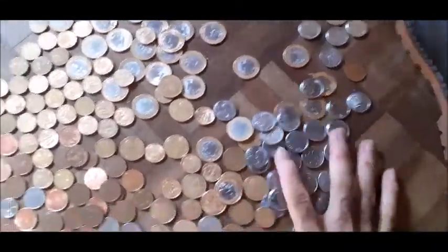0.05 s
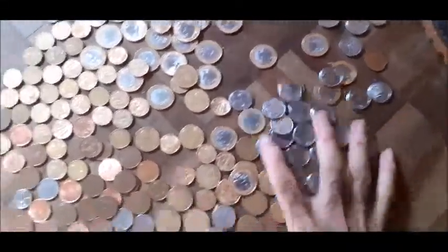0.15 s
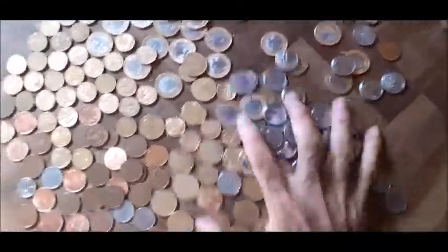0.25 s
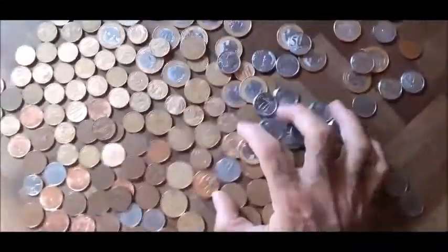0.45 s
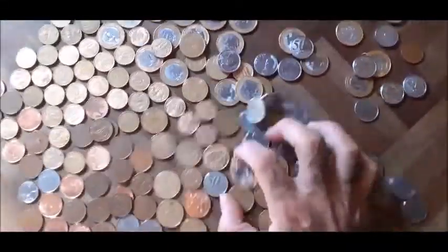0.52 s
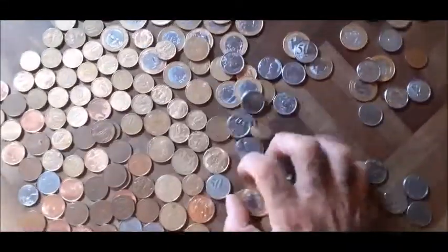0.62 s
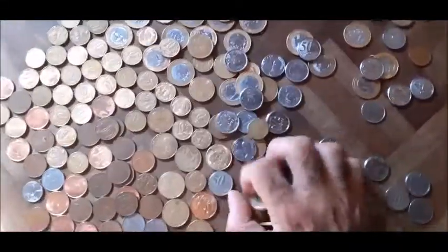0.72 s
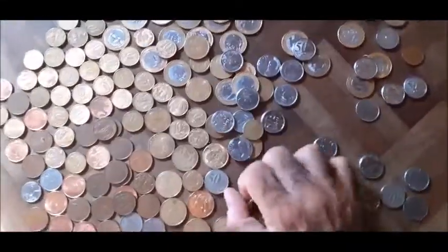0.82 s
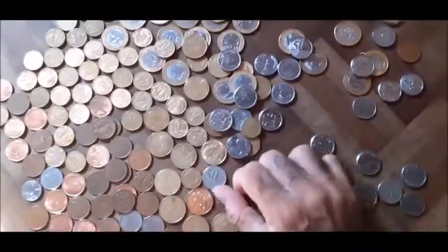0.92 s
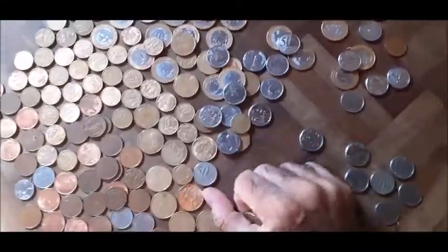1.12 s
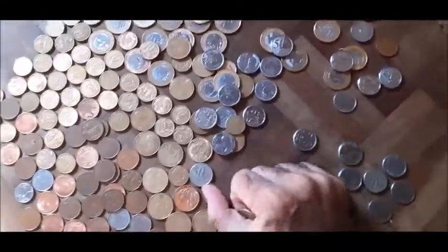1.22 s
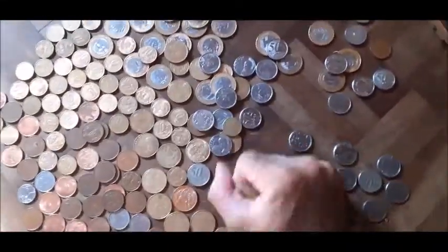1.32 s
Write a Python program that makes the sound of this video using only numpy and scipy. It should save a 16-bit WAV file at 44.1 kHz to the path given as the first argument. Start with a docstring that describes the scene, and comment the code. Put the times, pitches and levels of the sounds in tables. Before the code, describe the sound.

Coins jingle, click and slide over a wooden surface, pushed by a hand.

```python
"""A hand pushes loose coins over a wooden top, close to a phone in a small room.
From the start the coins jostle in a dense run of tiny impacts, with sharper clicks among them.
By 0.3 s their faces scrape the wood, which rumbles and knocks when a coin tips off a pile.
The clatter builds, and just after 0.8 s small coins, free to vibrate, give a brief high ring.
More scraping follows, then a last clink near 1.2 s, and the sound dies away into faint hiss."""
import sys
import numpy as np
from scipy import signal
from scipy.fft import rfft, irfft
from scipy.io import wavfile
from scipy.ndimage import uniform_filter1d

SR = 44100
rng = np.random.default_rng(int(sys.argv[2]) if len(sys.argv) > 2 else 0)


def to_wav(s):
    """Save 16-bit WAV."""
    ch = np.atleast_2d(s).T  # columns
    pcm = np.round(np.clip(ch, -1, 1) * 32767)  # PCM
    wavfile.write(sys.argv[1], SR, pcm.astype(np.int16))


N = 59535

# Levels are relative within each table.
# rim-to-rim impacts: start_s, level_db, centre_hz
RIM_CLICKS = [(.0030, -27.5, 10300), (0.0206, -23, 11200), (0.037, -33, 9900), (0.0399, -23, 9300),
              (0.0658, -18, 9200), (0.0892, -26, 8500), (0.1114, -17, 9700), (.1443, -20.5, 8250),
              (0.156, -25, 8500), (0.205, -19.5, 6950), (0.247, -38, 5950), (0.267, -16, 6240),
              (.2714, -22, 10700), (0.3194, -18, 11100), (0.3229, -14.5, 11900), (0.4272, -16.5, 9300),
              (0.4615, -23, 7100), (0.5284, -20, 4340), (0.55, -25, 9300), (0.551, -9.5, 7240),
              (0.555, -30, 8500), (0.5985, -13, 7400), (0.632, -28, 11000), (0.6365, -11, 6960),
              (0.649, -8.5, 13200), (0.6834, -11, 10700), (0.686, -10.5, 10300), (0.7073, -25, 11500),
              (0.7179, -14, 12000), (0.7666, -18, 10100), (0.7745, -22, 5200), (0.7985, -19, 8000),
              (0.816, -18, 10000), (0.8202, -16, 6750), (0.841, -14, 9600), (.9688, -18, 10000),
              (0.986, -20, 9200), (1.0097, -41, 6840), (1.025, -18, 9600), (1.0461, -20, 8000),
              (1.114, -46, 8900), (1.1486, -46, 9500), (1.1694, -38, 8500), (1.1812, -21, 9060),
              (1.2450, -40.5, 6300), (1.3191, -45, 9050)]
# coins struck while free to vibrate: start_s, level_db, pitch_hz, t60_s
FREE_RINGS = [(.003, -25, 11010, 0.052), (.041, -36, 11100, 0.028), (0.169, -44, 11350, .12),
              (0.191, -36, 11300, .15), (0.223, -18, 11325, 0.04), (0.269, -12.5, 11610, 0.05),
              (.377, -25, 15600, .08), (.427, -29, 15660, 0.091), (0.63, -19, 11400, 0.076),
              (.636, -16, 15650, 0.069), (0.674, -18, 11000, 0.03), (0.8085, -4, 15545, .07),
              (.8125, -20, 15670, 0.037), (.820, -29, 15615, 0.061), (0.843, -18, 11068, .15),
              (0.843, -5, 16100, 0.093), (.865, -35, 15500, 0.13), (.874, -23, 15600, .06),
              (1.1808, -17, 15700, .018)]
# coin edges catching on the wood: start_s, level_db, pitch_hz
EDGE_CLACKS = [(.319, -37, 1600), (.472, -41.5, 1500), (.5288, -31.5, 3600), (.592, -31.5, 1500),
               (.598, -32, 1600), (.686, -33.5, 1200), (0.7736, -33, 1810), (.792, -28.5, 1400),
               (.840, -36, 1400), (.935, -39, 1500), (.966, -41, 1600), (1.0105, -30, 1400),
               (1.0435, -29.5, 1400), (1.147, -46, 1400), (1.192, -48.5, 1400), (1.245, -54, 1500),
               (1.278, -65, 1600)]
# coins dropping flat: start_s, level_db, left_minus_right_db
FLAT_DROPS = [(.065, -52.5, -4), (.326, -38.5, -14), (0.348, -48, -16), (0.6, -37, 3), (.638, -33.5, -18.5),
              (.647, -33, -13.5), (.686, -30.5, 4), (0.72, -33.5, -9.5), (.871, -45.5, -20.5)]
# normal modes of the wooden top: pitch_hz, level_db, t60_s
WOOD_MODES = [(103, -15, 0.15), (221, -12, 0.036), (289, -7.5, 0.042), (352, -3.5, 0.043),
              (526, -13.5, 0.015), (565, -13, 0.075), (775, -12, 0.036), (980, -7, 0.021)]

# envelopes of the continuous textures: time_s, level_db
RUMBLE_LEVEL = [(0, -72), (.07, -62), (.21, -65), (.27, -55), (.35, -55.5), (.40, -60), (.53, -64.5),
                (.56, -50.5), (.65, -50.5), (.76, -56), (0.859, -47.5), (.92, -70.5), (1.03, -57),
                (1.10, -69), (1.35, -72.5)]
SCRAPE_LEVEL = [(0, -79), (.06, -67), (.07, -56.5), (.2, -65), (.24, -52.5), (.29, -44.5), (.34, -45),
                (.38, -50), (.42, -45.5), (.52, -56), (.56, -38.5), (.595, -45), (.615, -45.5),
                (.69, -45.5), (.765, -58), (.777, -40.5), (.81, -44), (.875, -43.5), (.92, -55),
                (.955, -50), (.968, -34.5), (.982, -61.5), (1.0, -36.5), (1.048, -48.5), (1.06, -73),
                (1.14, -79), (1.168, -48), (1.24, -68), (1.35, -65)]
JOSTLE_LEVEL = [(0, -34.5), (.03, -63), (.058, -52), (.068, -45.5), (.104, -42.5), (0.113, -33.5),
                (.138, -42.5), (.148, -35), (.195, -40), (.255, -29), (.272, -27.5), (.33, -32.5),
                (0.414, -38), (0.439, -30), (.51, -50), (.526, -40), (.532, -31.5), (.546, -31.5),
                (.556, -27.5), (.598, -23.5), (.606, -39), (.626, -25), (.64, -31.5), (.668, -32.5),
                (.69, -31.5), (.73, -32.5), (0.762, -41.5), (0.775, -30), (.86, -33), (.92, -38),
                (.955, -38.5), (1.0, -30.5), (1.047, -28), (1.058, -37), (1.142, -66), (1.148, -42),
                (1.171, -38), (1.23, -52.5), (1.29, -63.5), (1.35, -67)]
LARGE_COIN_LEVEL = [(0, -41), (0.059, -77.5), (.12, -39.5), (.2, -33), (.27, -35), (.36, -38.5), (.45, -43),
                    (.51, -61), (.544, -37), (.556, -29.5), (.626, -29.5), (.635, -19.5), (.69, -29),
                    (.76, -42), (.79, -40), (.87, -35), (.94, -49), (1.01, -29.5), (1.13, -72),
                    (1.175, -68), (1.22, -76), (1.35, -63)]
SMALL_COIN_LEVEL = [(0, -72), (.1, -64), (.19, -46), (.27, -30), (.31, -45), (.45, -60), (.51, -79),
                    (.555, -44), (.625, -30), (.64, -25), (.69, -38), (.76, -39), (.8, -34), (.85, -14),
                    (.92, -35), (1.03, -38), (1.142, -75), (1.15, -49), (1.175, -37.5), (1.2, -48),
                    (1.25, -66), (1.35, -75)]

# spectral shapes: frequency_hz, gain_db
HISS_SPECTRUM = [(20, -14), (50, 4), (100, 5), (400, -27), (1500, -6), (4000, 7.5), (9000, -48),
                 (11000, -22), (16000, -22)]
RUMBLE_SPECTRUM = [(20, -34), (36, -18), (55, 1.5), (105, 8), (160, 1), (310, 2.5), (480, -6.5), (850, -2),
                   (1400, -13.5), (4000, -31)]
SCRAPE_SPECTRUM = [(300, -34), (850, -29), (1080, -3.5), (1400, 1.5), (1800, -0.5), (2400, -5), (3200, -1),
                   (4500, -11), (8000, -24), (16000, -40)]
JOSTLE_SPECTRUM = [(500, -47), (2000, -6.5), (3200, -7), (4500, -3.5), (7000, -7), (9000, -0.5),
                   (10200, -8), (12500, -2.5), (14500, -1), (16000, 2)]
ROOM_SPECTRUM = [(200, -12.5), (1500, 5.5), (9000, 1.5), (11500, -2), (15500, -19)]
# imbalance of the microphones: frequency_hz, left_minus_right_db
MIC_BALANCE = [(100, -4.5), (300, -4.5), (700, -1), (1400, -6), (2500, -1), (5000, 3.5), (8000, -0.5),
               (11500, 8.5), (15500, 4.5)]

# partials of coins held in the heap: pitch_hz
HELD_COIN_HZ = [5980, 6520, 7020, 7300, 8060, 7830, 7990, 8600, 9700]
LARGE_COIN_HZ = [11070, 11320, 11385, 11490, 11530, 11655, 12210, 12355]
SMALL_COIN_HZ = [15415, 15490, 15546, 15616, 15675, 15713]

CONTACT_ATTACK_S, RING_ATTACK_S = .00052, .00088
MIC_COMMON_SHARE, RIGHT_MIC_LAG_S = .39, .000042


def undb(db):
    """Amplitude grows tenfold for every 20 dB."""
    return 10 ** (np.asarray(db) / 20)


def add(out, x, start_s):
    """Superposition: a stereo sound adds to the mix from its start time."""
    i = int(np.clip(start_s * SR, 0, N - 1))
    out[:, i:i + x.shape[1]] += x[:, :N - i]


def spectrum(points, hz):
    """Interpolation on a logarithmic frequency axis gives a spectral shape in dB."""
    frequency_hz, gain_db = np.array(points, float).T
    return np.interp(np.log(hz + 1), np.log(frequency_hz), gain_db)


def colour(x, points):
    """Linear filtering multiplies the spectrum by a smooth gain curve."""
    gain = undb(spectrum(points, np.fft.rfftfreq(2 * N, 1 / SR)))
    return irfft(rfft(x, 2 * N) * gain)[..., :N]


def highpass(x, hz, order):
    """A Butterworth filter attenuates what lies below its cutoff."""
    return signal.sosfilt(signal.butter(order, hz, "high", fs=SR, output="sos"), x)


def follow(x, envelope):
    """Amplitude modulation: a texture, levelled by its running rms, takes on a slow envelope."""
    time_s, level_db = np.array(envelope, float).T
    power = uniform_filter1d(uniform_filter1d(np.mean(x ** 2, 0), size=700), size=700)
    gain = undb(np.interp(np.arange(N) / SR, time_s, level_db))
    return x / np.sqrt(np.abs(power) + 1e-12) * gain


def unit(x):
    """Normalisation brings the rms to 1."""
    return x / np.sqrt(np.mean(x ** 2) + 1e-18)


def stereo_noise(count):
    """Partial coherence: the two microphones share part of the noise power."""
    noise = rng.standard_normal((3, count))
    return np.sqrt(MIC_COMMON_SHARE) * noise[0] + np.sqrt(1 - MIC_COMMON_SHARE) * noise[1:]


def impulses(per_s, scatter_db):
    """Shot noise: independent tiny impacts of uneven strength."""
    return stereo_noise(N) * (rng.random(N) < per_s / SR) * undb(scatter_db * rng.standard_normal(N))


def contact(hz, decay_s, q):
    """A hard impact is a brief burst of noise, shaped by one broad resonance."""
    t = np.arange(int(6 * decay_s * SR) + 200) / SR
    burst = stereo_noise(len(t)) * np.exp(-t / decay_s) * (1 - np.exp(-t / CONTACT_ATTACK_S))
    crack = signal.lfilter(*signal.iirpeak(hz, q, fs=SR), burst)
    return unit(crack) * np.sqrt(.001 / t[-1])  # the energy of rms 1 held for a millisecond


def mode(hz, t60_s):
    """A damped normal mode is a sinusoid that falls 60 dB in t60_s."""
    t = np.arange(SR // 4) / SR
    return np.sin(2 * np.pi * hz * t) * np.exp(-np.log(1000) * t / t60_s)


def hiss():
    """Stationary coloured noise forms a faint floor, independent in each channel."""
    return unit(colour(rng.standard_normal((2, N)), HISS_SPECTRUM))


def room(direct, t60_s=.32, delay_s=.004, tail_db=-9):
    """Reverberation: reflections from nearby walls add a diffuse, exponentially decaying tail."""
    t = np.arange(N // 2) / SR
    tail = rng.standard_normal((2, len(t))) * np.exp(-np.log(1000) * t / t60_s) * (t > delay_s)
    tail /= np.sqrt(np.sum(tail ** 2, 1, keepdims=True))
    reflected = colour(signal.fftconvolve(direct, tail, axes=1)[:, :N], ROOM_SPECTRUM)
    return direct + undb(tail_db) * reflected


def wooden_top():
    """Sliding coins force the top to rumble; a coin dropping flat excites its modes as a knock."""
    rumble = colour(impulses(per_s=780, scatter_db=.5), RUMBLE_SPECTRUM)
    out = undb(.5) * follow(rumble, RUMBLE_LEVEL)
    for start_s, level_db, pan_db in FLAT_DROPS:
        knock = 0
        for hz, mode_db, t60_s in WOOD_MODES:
            strength = undb(mode_db + 2 * rng.standard_normal((2, 1))) * rng.choice([-1, 1])
            detune = 1 + .081 * rng.standard_normal()
            knock += strength * mode(hz * detune, t60_s)
        channel_db = level_db + np.array([[pan_db], [-pan_db]]) / 2
        add(out, knock * undb(channel_db), start_s)
    return highpass(out, hz=73, order=1)  # the top radiates little below this


def face_scrape(grains_per_s=450):
    """Sliding friction: coin faces rasp on the wood and chatter in short pitched grains."""
    grains = np.zeros((2, N))
    for _ in range(int(grains_per_s * N / SR)):
        when, tone = rng.random(2)
        grain = stereo_noise(1) * mode(hz=1100 * 4 ** tone, t60_s=.014)
        add(grains, grain, when * N / SR)
    chatter = unit(colour(grains, SCRAPE_SPECTRUM))
    rasp = unit(colour(impulses(per_s=1500, scatter_db=4), SCRAPE_SPECTRUM))
    return undb(-3) * follow(rasp + undb(-3) * chatter, SCRAPE_LEVEL)


def edge_clacks(decay_cycles=4.4):
    """An edge catching on the wood excites a heavily damped resonance, heard as a hollow clack."""
    out = np.zeros((2, N))
    for start_s, level_db, hz in EDGE_CLACKS:
        add(out, undb(level_db + 2) * contact(hz, decay_s=decay_cycles / hz, q=2), start_s)
    return highpass(out, hz=1050, order=4)


def nudged_coins(pitches_hz, per_s, t60_s):
    """Convolution: each mode responds to its own train of random nudges."""
    return sum(signal.fftconvolve(impulses(per_s, scatter_db=2), mode(hz, t60_s)[None])[:, :N]
               for hz in pitches_hz)


def heap_jingle():
    """Contact damping: coins pressed against their neighbours ring only briefly."""
    held = follow(nudged_coins(HELD_COIN_HZ, per_s=90, t60_s=.03), JOSTLE_LEVEL)
    large = follow(nudged_coins(LARGE_COIN_HZ, per_s=120, t60_s=.028), LARGE_COIN_LEVEL)
    small = follow(nudged_coins(SMALL_COIN_HZ, per_s=86, t60_s=.04), SMALL_COIN_LEVEL)
    return undb(-7.5) * held + undb(-3.5) * large + undb(-.5) * small


def free_rings():
    """Free vibration: a struck coin rings at one pitch; overlapping rings of close pitch beat."""
    out = np.zeros((2, N))
    for start_s, level_db, hz, t60_s in FREE_RINGS:
        ring = mode(hz, t60_s)
        ring *= 1 - np.exp(-np.arange(len(ring)) / SR / RING_ATTACK_S)
        add(out, undb(level_db) * np.array([ring, ring]), start_s)
    return out


def rim_clicks(decay_s=.00053, q=4.2, mean_bounce_s=.0043):
    """Inelastic collision: rims meet with a sharp click, then bounce and meet more weakly."""
    out = np.zeros((2, N))
    for start_s, level_db, hz in RIM_CLICKS:
        add(out, undb(level_db - 5) * contact(hz, decay_s, q), start_s)
        bounce = undb(level_db - 8) * contact(hz, decay_s, q)
        add(out, bounce, start_s + mean_bounce_s * (.5 + rng.random()))
    return highpass(out, hz=3500, order=4)


def jostle(contacts_per_s=900, low_hz=5010, high_hz=13860, scatter_db=2.5):
    """Incoherent summation: tiny impacts of random time, pitch and strength merge into a clatter."""
    out = np.zeros((2, N))
    for _ in range(int(contacts_per_s * N / SR)):
        when, tone = rng.random(2)
        hz = low_hz * (high_hz / low_hz) ** tone
        strength = undb(scatter_db * rng.standard_normal())
        add(out, strength * contact(hz, decay_s=.0006, q=1.6), when * N / SR)
    return undb(-.5) * follow(colour(out, JOSTLE_SPECTRUM), JOSTLE_LEVEL)


def scene():
    """Superposition: coins and wood sound together in the room, over its faint hiss."""
    floor = undb(-64.5) * hiss()
    direct = rim_clicks() + free_rings() + wooden_top()
    direct += face_scrape() + edge_clacks() + heap_jingle() + jostle()
    return room(direct) + floor


def record(dry, cutoff_hz=15850):
    """Stereo level and time cues: left is brighter, right fuller and later; both are low-passed."""
    hz = np.fft.rfftfreq(2 * N, 1 / SR)
    tilt_db = spectrum(MIC_BALANCE, hz) / 2
    lag = np.exp(-2j * np.pi * hz * RIGHT_MIC_LAG_S)
    response = np.array([undb(tilt_db), undb(-tilt_db) * lag])
    picked_up = irfft(rfft(dry, 2 * N) * response)[:, :N]
    return signal.sosfilt(signal.ellip(12, .2, 80, cutoff_hz, fs=SR, output="sos"), picked_up)


dry = scene()
out = record(dry)
to_wav(out)
```